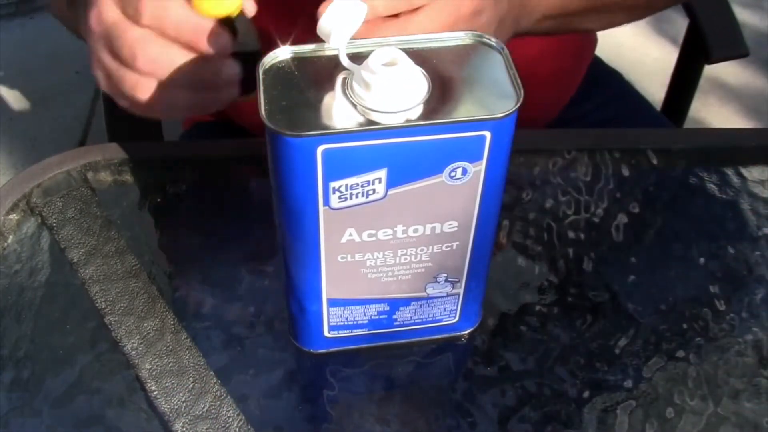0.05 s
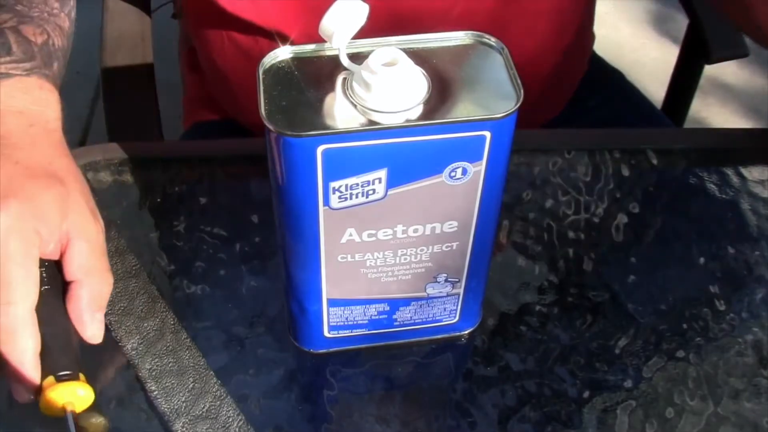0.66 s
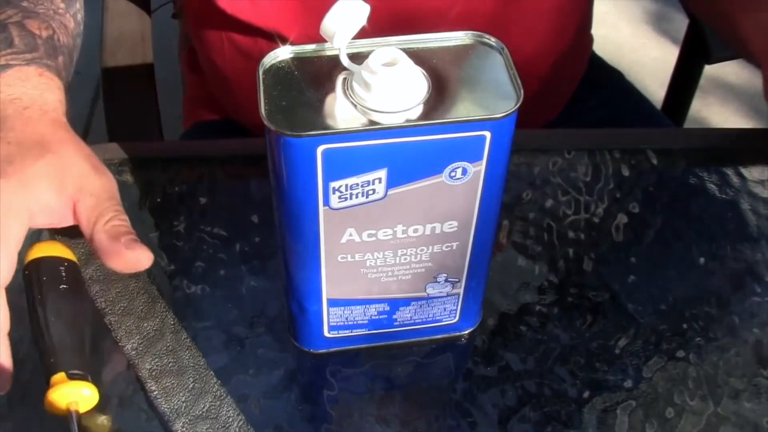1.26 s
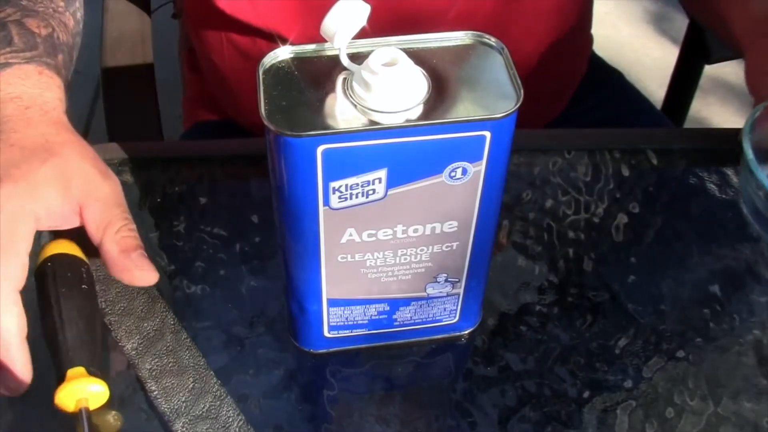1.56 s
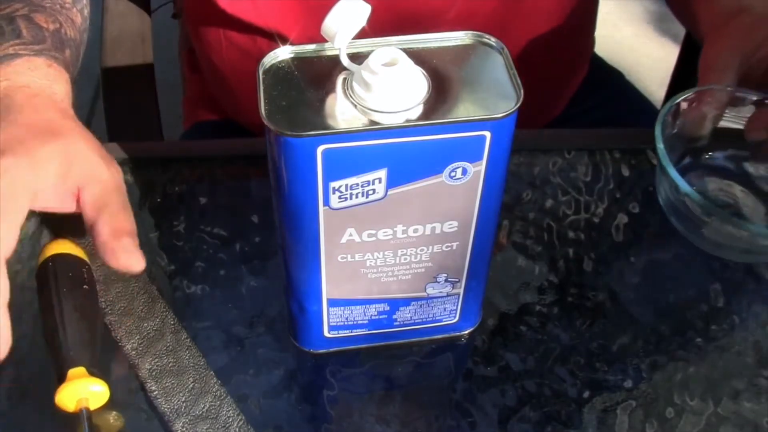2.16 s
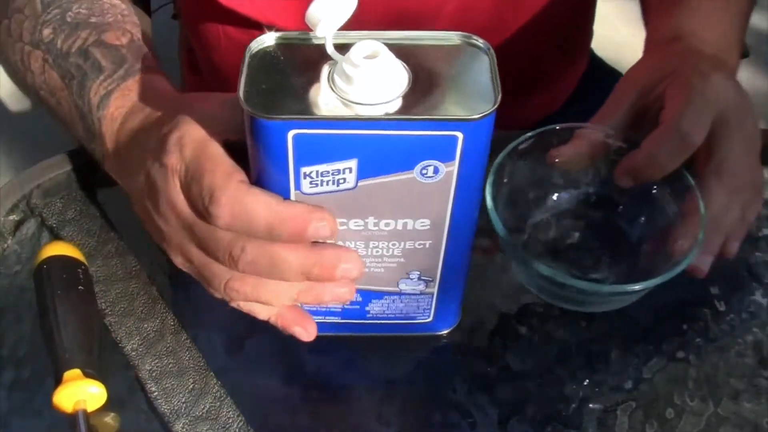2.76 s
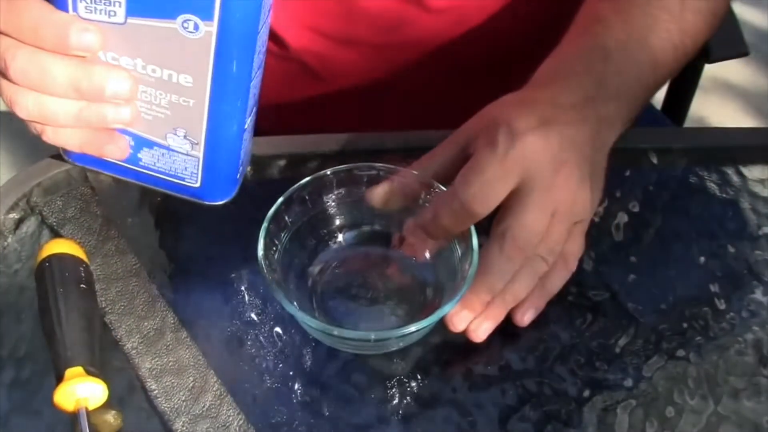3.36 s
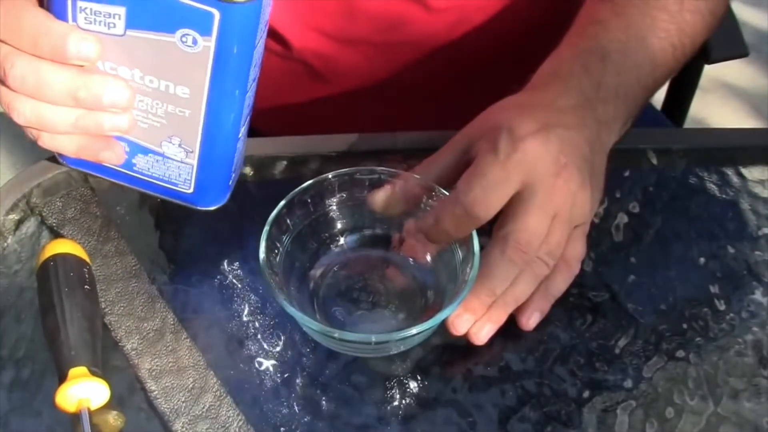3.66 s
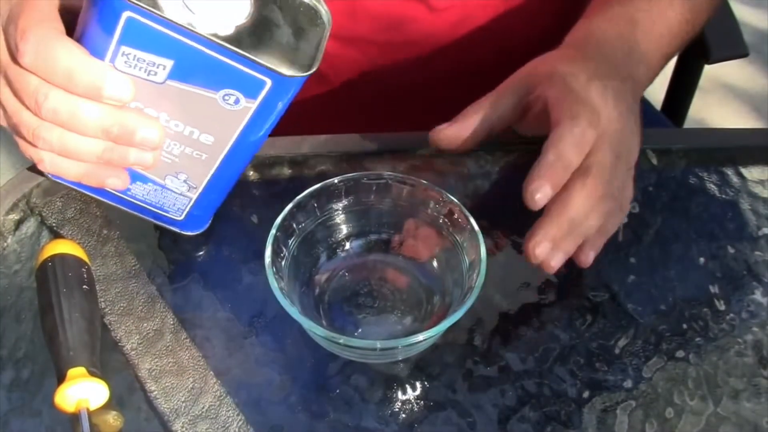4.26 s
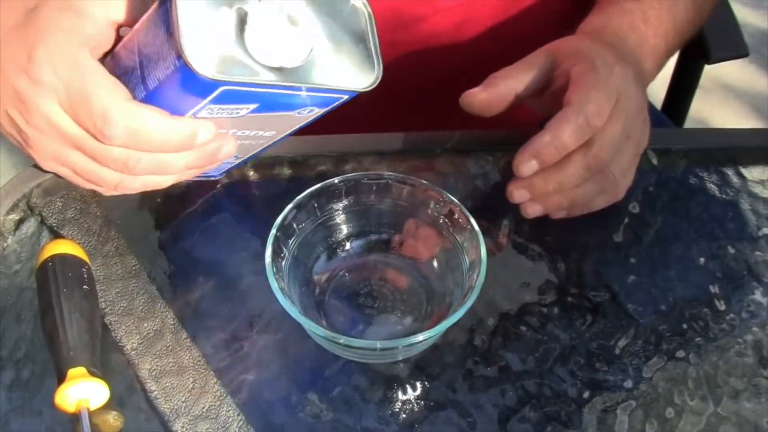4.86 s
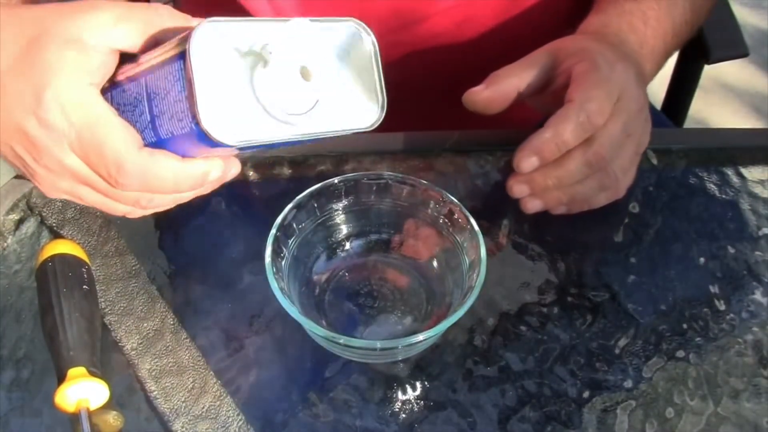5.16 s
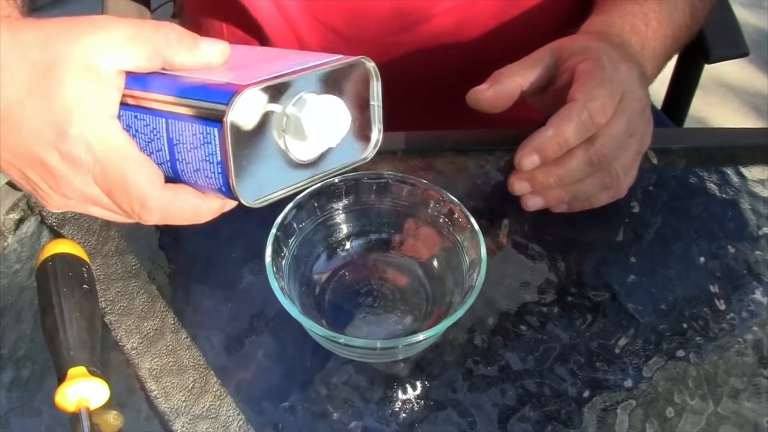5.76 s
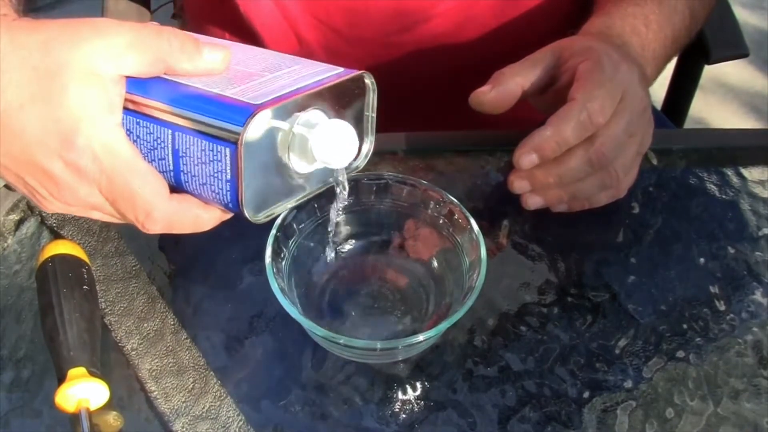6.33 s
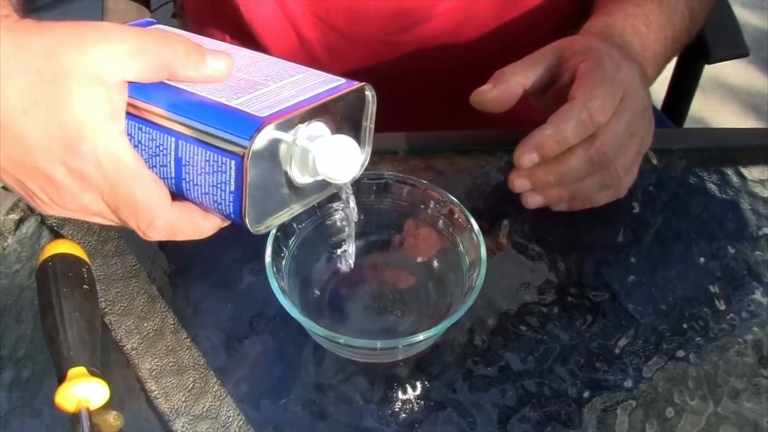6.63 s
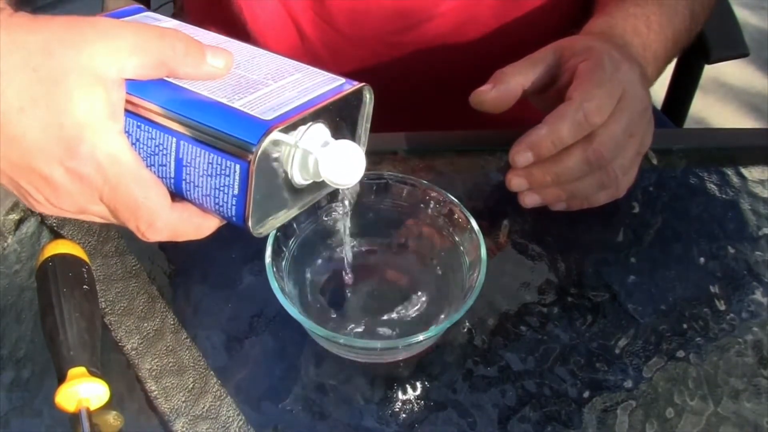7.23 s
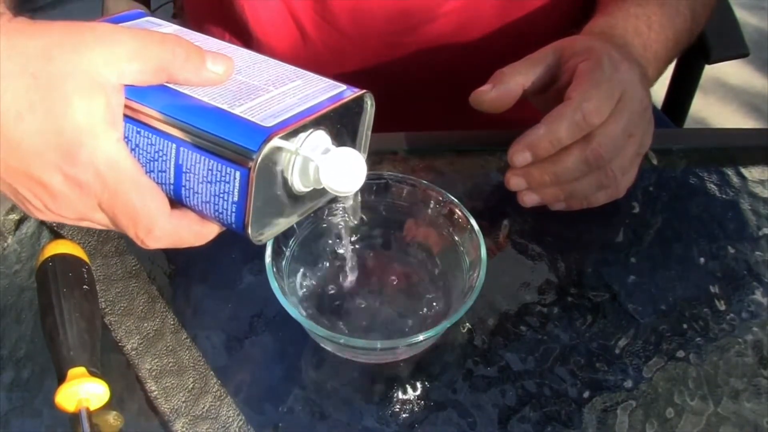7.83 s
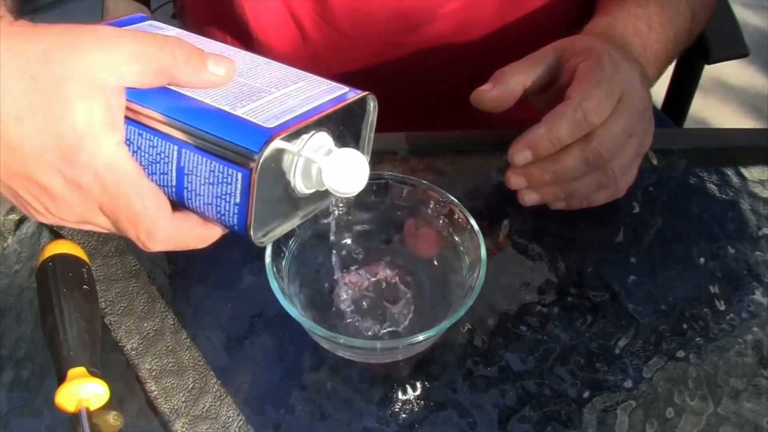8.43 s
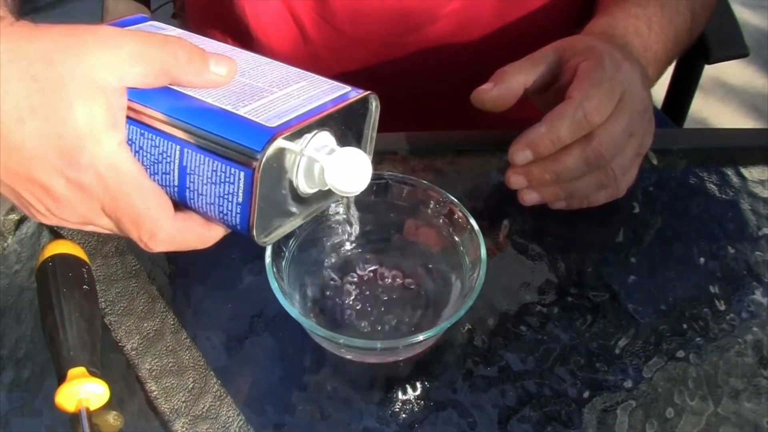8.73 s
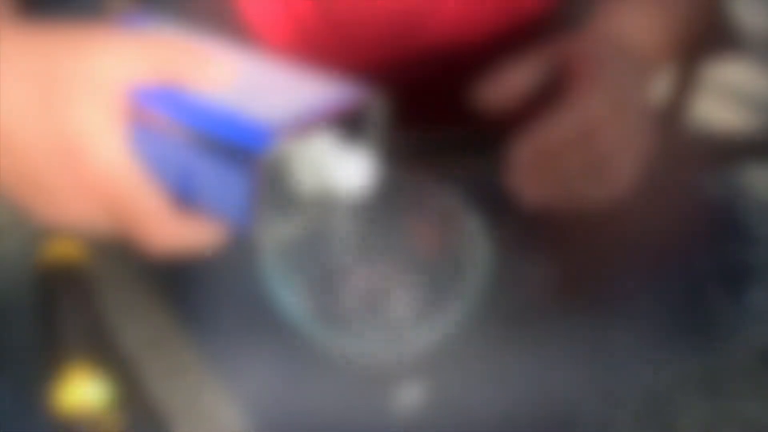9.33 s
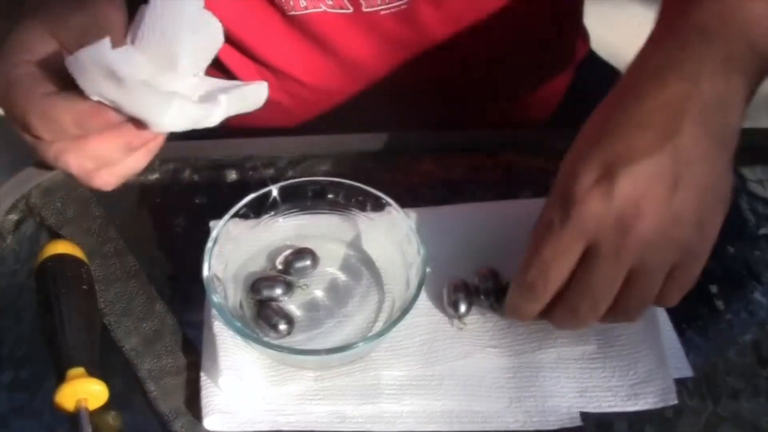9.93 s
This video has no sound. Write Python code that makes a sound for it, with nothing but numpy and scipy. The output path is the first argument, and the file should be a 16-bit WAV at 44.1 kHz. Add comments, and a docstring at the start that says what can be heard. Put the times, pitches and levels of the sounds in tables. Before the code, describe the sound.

Close by, in quiet outdoor air, a screwdriver slides on a glass tabletop and its handle rocks with dull, fading thuds. Next a glass bowl rattles down and scrapes briefly into position, making the table ring. After faint handling rubs and a lull, a tin can clinks against the bowl and liquid starts to pour in a thin, growing trickle of bubbles, small splashes and glassy pings.

```python
"""A skid, then soft thuds: a screwdriver slides onto a glass patio table and rocks to rest on its handle.
A glass bowl clatters down and is nudged into place; each contact rings the table's plate modes.
Hands rub faintly as a tin can is lifted. The can taps the bowl and a thin stream trickles in:
trapped bubbles plop, spit and fizz, and stray drops ping the glass. Soft open-air noise lies underneath."""
import sys
import numpy as np
from scipy import signal
from scipy.fft import rfft, irfft
from scipy.io import wavfile

SR = 44100
rng = np.random.default_rng(int(sys.argv[2]) if len(sys.argv) > 2 else 0)


def digitize_waveform(pressure):
    """Quantize a signal to 16-bit integers and store it at the path in sys.argv[1].

    Rows of a 2-D input are taken as channels; values are limited to [-1, 1].
    """
    field = np.atleast_2d(pressure).T
    bounded = np.clip(field, -1, 1)
    quanta = np.round(bounded * 32767).astype(np.int16)
    wavfile.write(sys.argv[1], SR, quanta)


N = 440559

# Open-air spectrum. Each row: frequency in Hz, relative level in dB.
AIR_SPECTRUM = [(18, -81), (30, -53.5), (104, -3.5), (148, 1), (181, -6), (201, 0), (301, -1), (387, -8.5),
                (596, -10.5), (711, -11), (808, -12), (1730, -19.5), (1910, -19.5), (4300, -24),
                (9800, -38), (12800, -55), (16600, -92.5), (22000, -120)]
# Its stereo width. Each row: frequency in Hz, side against mid in dB.
AIR_SIDE = [(60, -25.5), (110, -22.5), (200, -17), (350, -8), (640, -7), (1160, -7), (2090, -4.5),
            (3770, -7.5), (6820, -3.5), (12300, -3)]
# Hands rubbing. Each row: start in seconds, length in seconds, rush in dB, hiss in dB.
HAND_RUBS = [(0.903, 0.34, -54.5, -62.5), (1.107, 0.65, -59, -69.5), (2.95, 0.75, -57.5, -67.5),
             (3.777, 0.71, -57, -69), (4.216, 0.18, -68, -64.5), (4.372, 0.52, -58, -66)]
# The table's dense modes. Each row: frequency in Hz, strength in dB.
PLATE_STRENGTH = [(60, -29.5), (100, -8.5), (150, -12.5), (200, -0.5), (350, 4), (550, 2.5), (720, -0.5),
                  (1200, -4.5), (1800, -7.5), (2700, -8), (5000, -12), (7000, -9.5), (10000, -21),
                  (12500, -41)]
# Their decay. Each row: frequency in Hz, t60 in seconds.
PLATE_DECAY = [(100, 0.61), (400, 0.33), (1200, 0.27), (2700, 0.26), (4400, 0.18), (7000, 0.11),
               (11000, 0.21)]
# Distinct modes of table, bowl and can on bowl. Each row: frequency in Hz, gain in dB, t60 in seconds.
PLATE_MODES = [(154.4, 6, 0.47), (246, -4, 0.24), (694, -18.5, 0.19), (821, 10, .22), (920, 3.5, 0.35),
               (1053, 2.5, 0.3), (1172, 4.5, .22), (1236, 1, 0.233), (1298, 3.5, 0.21), (1426, 4.5, 0.093),
               (1575, -13, 0.13), (2530, -3, 0.187), (2700, -4, 0.17), (2735, 3.5, 0.12), (3360, 2, 0.211),
               (3460, 3, 0.15)]
BOWL_MODES = [(5160, -15, 0.057), (6730, -3, 0.1204), (8010, -19, .13), (9700, -10.5, .08),
              (10700, -6, 0.052)]
TAP_MODES = [(545, 2.5, 0.056), (1520, -5, 0.084), (1803, 0.5, 0.074), (2300, 1, 0.028), (2650, -8.5, 0.06),
             (3180, -1.5, 0.034), (4150, -15, 0.052), (5290, -5.5, 0.056), (6780, -10, 0.03),
             (7900, -32, 0.25), (11200, -23, 0.037)]
# Sliding contacts. Each row: start in seconds, level in dB, swell in seconds, bass in dB,
# bite near 2 kHz in dB, treble in dB, bowl ring in dB, damping in dB per second.
SCREWDRIVER_SKIDS = [(.572, -26, 0.031, -21, 2, 0, -73, 0), (.5965, -37.5, 0.0011, -7, -14, -2.5, -75, 10),
                     (.629, -47, 0.002, 0.5, -5, -25, -80, 35),
                     (.65, -44.5, 0.00093, -6.5, -1, -21, -76, 31),
                     (.902, -56, 0.0066, -2, 13, 13, -70, 300), (.907, -38, 0.012, 2, -4, -34, -80, 32.5),
                     (1.064, -69, 0.0024, 8, -17, 22, -60, 120)]
BOWL_NUDGES = [(3.021, -38.5, .0025, -8, -35, -15, -76.5, 61),
               (3.637, -30, 0.028, -8.5, 9.5, 6.5, -24.5, 25), (3.6565, -41, .004, -4, 2, -3, -40.5, 24.82),
               (3.684, -37.5, .003, -2, -4.5, -13.5, -56, 30),
               (3.709, -40.5, .002, -11, -2.5, -13.5, -61, 30), (3.7195, -45, .001, -24, 7.5, -10, -60, 30),
               (3.945, -69, 0.016, -3, 8, 22.5, -29.5, 40)]
# Peaks and dips of each contact spot. Each row: centre in Hz, width in Hz, gain in dB.
SCREWDRIVER_COLOUR = [(273, 150, 6.5), (750, 140, -1), (947, 77, 1.5), (1055, 25, 7), (1196, 40, -6),
                      (1380, 200, 5), (1550, 40, -2), (1810, 42, -11), (1770, 40, 0), (2120, 40, 6),
                      (2445, 105, 8.5), (2590, 40, 11.5), (3260, 90, 4), (3560, 190, 1.5),
                      (5640, 1700, -3.5)]
CLATTER_COLOUR = [(930, 74, 5), (1310, 46, 7), (1630, 150, 3), (1905, 86, 8), (2394, 60, 8), (2740, 200, 0),
                  (2950, 67, 6.5), (3680, 480, 7), (4170, 550, 9.5), (5300, 200, 7), (7400, 400, 3.5),
                  (8560, 170, 12), (9080, 160, 12.5), (11000, 1200, -14)]
NUDGE_COLOUR = [(150, 80, -1.5), (250, 150, -7), (590, 61, 6.5), (1388, 120, 4), (1220, 50, 10),
                (1680, 160, 1.5), (2220, 690, -5), (2600, 100, 6.5), (3460, 40, 2.5), (3700, 300, 3),
                (5870, 50, 3)]
# The handle rocking. Each row: start in seconds, thud in dB, thud pitch in Hz, table ring in dB,
# contact cut-off in Hz, left-right pan in dB.
HANDLE_ROCKS = [(0.8975, -12, 327, -46, 2300, -23.5), (1.1521, -15.5, 307, -46, 1880, 0),
                (1.352, -12.5, 319, -48.5, 715, 0), (1.573, -12.5, 294, -47.5, 470, 0),
                (1.755, -19.5, 322, -56, 470, -2), (1.951, -18.5, 318, -60, 497, 1)]
# Its rounder rebounds. Each row: start in seconds, level in dB, pitch in Hz.
HANDLE_REBOUNDS = [(0.91, -20, 322), (0.929, -20, 284), (0.94, -16, 252), (0.963, -17, 273),
                   (0.979, -22.5, 259), (1.005, -27.5, 264), (1.076, -29, 268), (1.189, -24.5, 310),
                   (1.21, -28, 330), (1.226, -28, 353), (1.37, -21.5, 352), (1.389, -26.5, 296),
                   (1.41, -30, 310), (1.595, -19, 286), (1.637, -27, 268), (1.653, -31.5, 280),
                   (1.786, -27.5, 328), (1.979, -34.5, 298)]
# Thin chirps. Each row: start in seconds, length in seconds, level in dB, pitch in Hz, width in Hz.
THIN_SQUEAKS = [(0.955, 0.19, -59.5, 10960, 300), (1.056, 0.029, -44.5, 4900, 300),
                (1.088, 0.028, -49, 6730, 200), (1.334, 0.07, -52.5, 4930, 220),
                (3.217, 0.11, -59, 4920, 300), (3.632, 0.064, -25.5, 6610, 44.7),
                (3.934, 0.076, -49, 6620, 80), (4.42, 0.28, -64, 6300, 900), (4.445, 0.17, -70, 10500, 500),
                (4.528, 0.18, -57.5, 4550, 700), (5.894, 0.053, -66.5, 5400, 120),
                (5.984, 0.06, -63.5, 4310, 130)]
# Bowl knocks: the bowl on the table, and at 6.96 s the can touching the bowl. Each row: start in seconds, #
# level in dB, bite near 2 kHz in dB, thud in dB, hand damping in dB per second, initial left-right pan in dB.
BOWL_KNOCKS = [(2.8436, -51.5, 15.5, -22.5, 143, 0), (2.905, -45, 12.5, -46, 205, 1),
               (2.9174, -41, 0, -25, 52, 0), (2.976, -44, -0.5, -25.5, 10, 1),
               (3.004, -40, 1.5, -25, 54.5, 0), (3.035, -42, -6, -19, 31.5, 2),
               (3.0576, -40, 1, -16, 124, 1), (3.0935, -36.5, -1, -24, 58, -3),
               (3.793, -48.5, -8, -38, 29, 0), (3.806, -34, 6, -41.5, 39, 12.5),
               (3.8124, -39, 9, -42.5, 60, -2), (3.818, -38, -4, -33, 53.5, -2),
               (6.9606, -40.5, 1, -25.5, 62, 2)]
# Single bubbles. Each row: start in seconds, level in dB, pitch in Hz, t60 in cycles.
PLOP_BUBBLES = [(4.197, -37, 528, 24), (6.361, -49, 1430, 69.5), (6.375, -50, 1690, 60.5),
                (6.9471, -14.5, 3950, 41), (7.0554, -17.5, 2090, 25), (7.273, -32.5, 693, 34),
                (7.466, -31.5, 2670, 45), (7.479, -21, 1420, 20), (7.4925, -26.5, 1810, 33),
                (7.646, -12, 5920, 55), (7.663, -27, 1677, 50), (7.7893, -14.5, 2920, 20),
                (7.8, -27, 2250, 31), (8.0152, -26, 2160, 11), (8.162, -36, 1900, 30),
                (8.1954, -19, 3060, 46), (8.22, -37, 810, 27), (8.229, -26, 1100, 37),
                (8.237, -23.5, 1286, 27), (8.257, -26, 1176, 31), (8.392, -23.5, 2290, 52),
                (8.399, -17, 2620, 32), (8.432, -31, 2770, 28), (8.459, -27.5, 3540, 40),
                (8.475, -33, 1490, 20), (8.494, -30, 1460, 31), (8.509, -29, 1870, 29),
                (8.6201, -27.5, 1397, 27), (8.6494, -15.5, 2110, 38), (8.668, -27.5, 1260, 24),
                (8.6758, -30, 925, 35), (8.729, -30, 1064, 18), (8.8482, -22.5, 1695, 33),
                (8.893, -33, 2670, 29), (8.927, -27, 1180, 35), (8.9581, -21.5, 3470, 19),
                (8.959, -27, 1340, 16), (8.9762, -23, 4790, 51), (9.1367, -10, 3420, 23),
                (9.1499, -16, 2170, 28), (9.2073, -21.5, 2020, 24), (9.224, -21.5, 1430, 36),
                (9.287, -15.5, 2400, 3), (9.3453, -29.5, 702, 39), (9.395, -31, 1226, 23),
                (9.511, -27, 1264, 46), (9.578, -27, 1835, 36), (9.59, -23, 3610, 48),
                (9.63, -35, 1290, 25), (9.6713, -24, 1336, 48), (9.745, -24, 2700, 27),
                (9.751, -27.5, 2720, 47), (9.783, -26, 3145, 36), (9.801, -21.5, 1176, 32),
                (9.83, -35, 2160, 3), (9.9849, -32, 1214, 29)]
# Drops on bare glass. Each row: start in seconds, level in dB, pitch in Hz.
GLASS_PINGS = [(6.3, -62, 6660), (7.015, -41, 10930), (7.231, -34.5, 6450), (7.4125, -43, 6500),
               (7.603, -39, 10640), (7.741, -40, 6460), (7.88, -37, 6500), (7.957, -43, 6500),
               (8.105, -31.5, 10090), (8.15, -36, 6340), (8.369, -31.5, 6310), (8.852, -35, 6270),
               (9.507, -28, 6250)]
# Drops on liquid. Each row: start in seconds, level in dB, lowest pitch in Hz, left-right pan in dB.
DROP_SPITS = [(6.4748, -63, 9000, 0), (6.543, -59.5, 10950, 1), (7.0142, -35, 8600, 17),
              (7.055, -29, 4570, 2), (7.2, -39, 9300, -4), (7.338, -38.5, 8900, -3),
              (7.4126, -28, 7340, -22), (7.4345, -20.5, 8200, 1), (7.478, -27, 4950, 2),
              (7.574, -29, 7500, -1), (7.6024, -24, 10300, 1), (7.6575, -13.5, 7900, -0.5),
              (7.667, -19, 7400, 0), (7.7403, -22.5, 7200, 1.5), (7.797, -21.5, 6060, -5),
              (7.8082, -20, 3620, 0), (7.813, -20, 6000, 3), (7.834, -22, 6100, 2),
              (7.8788, -23.5, 6100, -2), (8.0145, -15.5, 3890, 0), (8.017, -14.5, 3790, 0),
              (8.1486, -23, 7620, 0), (8.1948, -19.5, 5330, 1.5), (8.216, -17, 6270, -1),
              (8.2257, -19, 8500, 4), (8.243, -17.5, 3560, 0.5), (8.258, -14.5, 6440, -1.5),
              (8.3211, -19, 3750, 5.5), (8.3922, -16.5, 5940, 2), (8.4, -27, 5370, -5),
              (8.433, -25.5, 6500, -5), (8.4722, -28, 6090, 3), (8.484, -19, 6130, -1),
              (8.5034, -20.5, 7900, -2), (8.591, -18, 7160, 1), (8.6144, -14.5, 4980, 2),
              (8.6235, -15.5, 5850, 1), (8.675, -20.5, 5870, -2), (8.793, -20, 6000, -1),
              (8.816, -21.5, 9100, -2), (8.854, -20.5, 6380, 3), (8.89, -26, 6880, 2),
              (8.897, -21, 4550, 1), (8.901, -23, 6850, -1), (8.964, -37, 9300, -2),
              (9.0261, -16, 6320, -1), (9.052, -38, 6900, 0), (9.087, -24, 7200, 20),
              (9.093, -21, 6000, 13), (9.1201, -13.5, 6500, 2), (9.1499, -18.5, 4300, -1),
              (9.166, -23, 8500, 0), (9.184, -26, 6530, -1), (9.207, -33.5, 5850, -5),
              (9.2864, -17, 3350, 1), (9.328, -20.5, 6200, -2), (9.3548, -26, 7500, 0),
              (9.3691, -14.5, 6320, -0.5), (9.4045, -23, 7500, 0), (9.4095, -34, 5500, 3),
              (9.415, -30, 7100, 2), (9.4288, -15, 6150, -0.5), (9.626, -21, 6980, 0),
              (9.634, -22, 5640, 0), (9.654, -24, 8300, -2), (9.7419, -22.5, 6330, -2),
              (9.763, -22.5, 5310, 1), (9.8007, -15.5, 4100, 2), (9.808, -21.5, 4020, -6),
              (9.83, -25, 3600, 0), (9.854, -30, 5700, 1), (9.8828, -24.5, 3480, -1.5),
              (9.8885, -24.5, 5380, 2)]
# The stream's churn. Each row: time in seconds, share of full pour.
POUR_FLOW = [(7.25, 0.024), (7.45, 0.56), (7.7, 0.73), (8.1, 0.68), (8.6, 0.99), (9.3, 0.84), (9.99, 0.99)]
# The stream breaking up. Each row: start in seconds, length in seconds, lead bubble level in dB,
# lowest pitch in Hz.
STREAM_SPLASHES = [(7.473, 0.021, -41, 1510), (7.637, 0.012, -31, 4970), (7.791, 0.034, -32, 2770),
                   (7.952, 0.078, -34, 3750), (8.154, 0.044, -35, 2040), (8.208, 0.039, -36, 4500),
                   (8.388, 0.056, -29.5, 2330), (8.453, 0.065, -28.5, 1720), (8.611, 0.026, -27, 2350),
                   (8.65, 0.053, -34.5, 1365), (8.838, 0.066, -27, 2220), (8.905, 0.036, -37.5, 2510),
                   (9.084, 0.062, -28.5, 2380), (9.156, 0.072, -39, 2406), (9.278, 0.014, -24.5, 2057),
                   (9.301, 0.046, -30, 2330), (9.401, 0.068, -35, 4120), (9.504, 0.026, -34, 2196),
                   (9.562, 0.028, -33.5, 2066), (9.625, 0.021, -42, 1510), (9.743, 0.047, -33, 2410),
                   (9.79, 0.046, -33.5, 1464)]

CONTACT_PAN_DB, RUMBLE_T60_S = -1, 0.85
TAP_S = 6.9605
SMALLEST_BUBBLE_HZ, SMALL_BUBBLE_CYCLES = 11290, 52


def from_db(db):
    """Decibels to gain."""
    return 10 ** (np.asarray(db) / 20)


def rms_one(x):
    """Scale to rms 1."""
    return x / np.sqrt(np.mean(x ** 2) + 1e-20)


def at_hz(points, hz):
    """Read a table on a log-frequency axis."""
    known_hz, values = np.transpose(points)
    return np.interp(np.log(np.maximum(hz, 1)), np.log(known_hz), values)


def seconds(length_s):
    """Time axis."""
    return np.arange(int(length_s * SR)) / SR


def fade(t, t60_s):
    """Free decay, 60 dB down at t60_s."""
    return np.exp(-np.log(1000) * t / t60_s)


def stereo(mid, side, pan_db=0):
    """Mid and side to panned left and right."""
    return np.array([mid + side, mid - side]) * from_db([[pan_db / 2], [-pan_db / 2]])


def add(track, start_s, sound):
    """Mix a sound in at start_s."""
    i = int(np.clip(start_s * SR, 0, N - 1))
    track[..., i:i + sound.shape[-1]] += sound[..., :N - i]


def narrow_noise(hz, width_hz, length_s):
    """Noise of rms 1 around one pitch."""
    t = seconds(length_s)
    lowpass = signal.butter(2, width_hz / 2, fs=SR, output="sos")
    sway = signal.sosfilt(lowpass, rng.standard_normal((2, len(t))))
    return rms_one(sway[0] * np.sin(2 * np.pi * hz * t) + sway[1] * np.cos(2 * np.pi * hz * t))


def flow_at(time_s):
    """Share of full pour."""
    return np.interp(time_s, *np.transpose(POUR_FLOW), left=0)


def wash_power(air_db=(-59, -62.5, -75.5), pour_db=(-52, -57, -64.5), spray_db=-28, shake_db=-32):
    """Rumble, rush and hiss power over time: air, pour, hands, spray and the shaken table."""
    power = from_db(air_db)[:, None] ** 2 + (from_db(pour_db)[:, None] * flow_at(np.arange(N) / SR)) ** 2
    for start_s, length_s, rush_db, hiss_db in HAND_RUBS:
        rub_power = from_db([[rush_db + 2.5], [rush_db], [hiss_db]]) ** 2
        add(power, start_s, rub_power * np.hanning(int(length_s * SR)))
    for start_s, length_s, lead_db, _ in STREAM_SPLASHES:
        lingering = np.hanning(int((length_s + 0.027) * SR))
        add(power[2], start_s, from_db(lead_db + spray_db) ** 2 * lingering)
    for start_s, thud_db, *_ in HANDLE_ROCKS:
        add(power[0], start_s, (from_db(thud_db + shake_db) * fade(seconds(2), RUMBLE_T60_S)) ** 2)
    return power


def wash(low_hz=500, high_hz=4800):
    """Soft noise in three bands, swelling with handling and pouring."""
    hz = np.fft.rfftfreq(N, 1 / SR)
    mid, side = rfft(rng.standard_normal((2, N))) * from_db(at_hz(AIR_SPECTRUM, hz))
    spectrum = stereo(mid, from_db(at_hz(AIR_SIDE, hz)) * side)
    rumble = 1 / (1 + (hz / low_hz) ** 4)
    hiss = 1 - 1 / (1 + (hz / high_hz) ** 6)
    bands = [rms_one(irfft(spectrum * share, N)) for share in (rumble, 1 - rumble - hiss, hiss)]
    return sum(band * np.sqrt(power) for band, power in zip(bands, wash_power()))


def thin_tone(hz=1790, width_hz=90, level_db=-74):
    """A faint, flickering tone in the open air."""
    return from_db(level_db) * narrow_noise(hz, width_hz, N / SR + 1)[:N]


def glass_plate(count=690, spacing_hz=17):
    """Plate modes, about evenly spaced: pitches, strengths and free decays."""
    hz = 50 + spacing_hz * (np.arange(count) + rng.uniform(-.3, .3, count))
    dense = np.column_stack([hz, at_hz(PLATE_STRENGTH, hz), at_hz(PLATE_DECAY, hz)])
    hz, level_db, t60_s = np.vstack([dense, PLATE_MODES]).T
    t = seconds(.25)
    return hz, from_db(level_db), np.sin(2 * np.pi * hz[:, None] * t) * fade(t, t60_s[:, None])


def strike(plate, colour_db, width):
    """Each spot drives the modes with its own signs. Returns mid and side."""
    hz, strength, rings = plate
    signs = rng.choice([-1, 1], (2, len(hz)))
    mid, side = (signs * strength * from_db(colour_db)) @ rings
    return mid, width * side


def spot_db(spot, hz):
    """A contact spot favours some modes and misses others."""
    return sum(db * np.exp(-(2 * (hz - centre_hz) / width_hz) ** 2) for centre_hz, width_hz, db in spot)


def ripple_db(hz, spacing_hz=300):
    """The struck part adds random peaks and dips, most in the treble."""
    knots_db = rng.normal(-1, 3.5, 64)
    return np.interp(hz / spacing_hz, np.arange(len(knots_db)), knots_db) * np.minimum(hz / 6000, 1)


def bowl_ring(t):
    """The glass wall's response to one touch."""
    return sum(from_db(db) * np.sin(2 * np.pi * hz * t) * fade(t, t60_s) for hz, db, t60_s in BOWL_MODES)


def contact(plate, spot, level_db, swell_s, bass_db, bite_db, treble_db, ring_db, damping_db_per_s):
    """Hard contact: a crack, then table and bowl ring under the hand's damping."""
    hz, t = plate[0], np.arange(plate[2].shape[1]) / SR
    tilt = [(600, bass_db), (1050, 0.00095), (1300, 0.002), (1900, bite_db), (7000, treble_db)]
    colour_db = at_hz(tilt, hz) + ripple_db(hz) + spot_db(spot, hz)
    crack = 1 + 0.845 * fade(t, t60_s=0.072)
    mid, side = strike(plate, colour_db + level_db, width=.2) * crack
    envelope = np.minimum(t / swell_s, 1) ** 2 * from_db(-damping_db_per_s * t)
    return stereo(mid + from_db(ring_db) * bowl_ring(t), side, CONTACT_PAN_DB) * envelope


def skids(plate):
    """Screwdriver and bowl slide and catch on the table."""
    out = np.zeros((2, N))
    for touches, spot in ((SCREWDRIVER_SKIDS, SCREWDRIVER_COLOUR), (BOWL_NUDGES, NUDGE_COLOUR)):
        for start_s, *touch in touches:
            add(out, start_s, contact(plate, spot, *touch))
    return out


def lean(sound, pan_db, t60_s=0.099):
    """An off-centre blow starts louder on one side, then spreads through the table."""
    t = np.arange(sound.shape[1]) / SR
    return sound * from_db(np.outer([.5, -.5], pan_db * fade(t, t60_s)))


def thud(level_db, hz, pan_db=CONTACT_PAN_DB, swell_cycles=1.17):
    """A hollow push of a few cycles."""
    t = seconds(.1)
    push = t * hz / swell_cycles
    envelope = (push * np.exp(1 - push)) ** 2
    return stereo(from_db(level_db) * np.sin(2 * np.pi * hz * t) * envelope, 0, pan_db)


def rocking(plate, body_hz=310, body_db=8, body_octaves=0.64):
    """Each rock of the soft handle thuds, knocks the table dully and rebounds."""
    out = np.zeros((2, N))
    hz, t = plate[0], np.arange(plate[2].shape[1]) / SR
    hollow_db = body_db * np.exp(-(np.log2(hz / body_hz) / body_octaves) ** 2)
    knock_db = spot_db([(1320, 300, 5)], hz)
    envelope = (1 - fade(t, t60_s=0.0045)) * (0.85 + 0.67 * fade(t, t60_s=0.12))
    for start_s, thud_db, thud_hz, table_db, cutoff_hz, pan_db in HANDLE_ROCKS:
        soft_db = -10 * np.log10(1 + (hz / cutoff_hz) ** 5)
        mid, side = strike(plate, hollow_db + knock_db + soft_db + table_db, width=0.14) * envelope
        add(out, start_s, lean(stereo(mid, side, CONTACT_PAN_DB), pan_db))
        add(out, start_s, thud(thud_db, thud_hz, pan_db))
    for start_s, level_db, bump_hz in HANDLE_REBOUNDS:
        add(out, start_s, thud(level_db, bump_hz, swell_cycles=1.82))
    return out


def drumming(table_hz=110, width_hz=32, after_rock_db=-43, full_pour_db=-66):
    """The table's lowest modes tremble after each rock and under the stream."""
    drive = from_db(full_pour_db) * flow_at(np.arange(N) / SR)
    for start_s, thud_db, *_ in HANDLE_ROCKS:
        add(drive, start_s, from_db(thud_db + after_rock_db) * fade(seconds(1.8), RUMBLE_T60_S))
    return drive * narrow_noise(table_hz, width_hz, N / SR + 1)[:N]


def squeaks():
    """Brief thin chirps and whistles; the loudest is the bowl's foot squealing on the table."""
    out = np.zeros(N)
    for start_s, length_s, level_db, hz, width_hz in THIN_SQUEAKS:
        tone = narrow_noise(hz, width_hz, length_s)
        add(out, start_s, from_db(level_db) * tone * np.hanning(len(tone)))
    return out


def knocks(plate, nudge_s=3.5, swell_s=0.00092, bass_db=-4, thud_hz=250, bounce_s=0.0206, bounce_db=-4):
    """The bowl clatters, brighter when harder; its weight thuds and bounces once."""
    out = np.zeros((2, N))
    mean_db = np.mean([row[1] for row in BOWL_KNOCKS])
    for start_s, level_db, bite_db, thud_db, damping_db_per_s, pan_db in BOWL_KNOCKS:
        treble_db = -17.5 + (level_db - mean_db) + 0.9 * bite_db
        ring_db = level_db + treble_db - 16
        spot = CLATTER_COLOUR if start_s < nudge_s else NUDGE_COLOUR
        knock = contact(plate, spot, level_db, swell_s, bass_db, bite_db, treble_db, ring_db,
                        damping_db_per_s)
        add(out, start_s, lean(knock, pan_db))
        add(out, start_s, thud(thud_db, thud_hz))
        add(out, start_s + bounce_s, thud(thud_db + bounce_db, thud_hz))
    return out


def bubble(level_db, hz, cycles, rise=0.061, onset_share=0.082):
    """A trapped bubble swells and rings, its pitch rising as it nears the surface."""
    life_s = max(cycles, 8) / hz
    t = seconds(life_s)
    onset_s = max(onset_share * life_s, 2 / hz)
    envelope = fade(t, life_s) * (1 - np.exp(-(t / onset_s) ** 2))
    phase = 2 * np.pi * hz * t * (1 + rise * (t / life_s - .2))
    return from_db(level_db) * envelope / envelope.max() * np.sin(phase)


def in_bowl(sound, echo_db=-18, spread_db=1.5, echoes=5):
    """Each place in the bowl has its own direction and quick echoes off wall and table."""
    paths = np.zeros((2, int(.006 * SR)))
    paths[:, 0] = from_db(rng.normal(0, spread_db) * np.array([.5, -.5]))
    gains = from_db(echo_db) * rng.choice([-1, 1], echoes) * rng.normal(1, 0.17, (2, echoes))
    paths[:, rng.integers(20, paths.shape[1], echoes)] = gains
    return np.array([np.convolve(sound, path) for path in paths])


def plops(ragged=0.13, jostle_cycles=1.77, shed_gap_s=.004, shed_octaves=1.1, shed_below_hz=3000):
    """A large bubble rings unevenly in churning liquid and sheds three weaker ones."""
    out = np.zeros((2, N))
    for start_s, level_db, hz, cycles in PLOP_BUBBLES:
        tone = bubble(level_db, hz, cycles, rise=.14, onset_share=.06)
        jolts = rng.standard_normal(64)
        jostle = np.interp(np.arange(len(tone)) / SR * hz / jostle_cycles, np.arange(len(jolts)), jolts)
        add(out, start_s, in_bowl(tone * (1 + ragged * flow_at(start_s) * jostle)))
        shed_gain = np.sqrt(flow_at(start_s) / (1 + (hz / shed_below_hz) ** 4))
        for k, (late, detune) in enumerate(rng.uniform(-0.499, 0.505, (3, 2)), 1):
            shed = bubble(level_db - 6 - 4.5 * k, hz * 2 ** (shed_octaves * detune), cycles, rise=.1)
            add(out, start_s + (k + late) * shed_gap_s, shed_gain * in_bowl(shed))
    return out


def pings(t60_s=0.061, swell_s=0.0017):
    """A drop on the bare wall rings one glassy mode."""
    out, t = np.zeros((2, N)), seconds(.1)
    envelope = fade(t, t60_s) * (1 - fade(t, swell_s))
    for start_s, level_db, hz in GLASS_PINGS:
        add(out, start_s, in_bowl(from_db(level_db) * np.sin(2 * np.pi * hz * t) * envelope))
    return out


def spits(count=3, base_cycles=27.3, stagger_s=0.00043, step_db=-4, wall_db=-24, sag_per_s=.028):
    """A drop bursts into tiny bubbles; the wall answers, its pitch sinking as the bowl fills."""
    out, t = np.zeros((2, N)), seconds(.1)
    for start_s, level_db, lowest_hz, pan_db in DROP_SPITS:
        burst = np.zeros(len(t))
        ladder_hz = np.geomspace(lowest_hz, SMALLEST_BUBBLE_HZ, count + 1)[:count]
        for k, hz in enumerate(ladder_hz * rng.normal(1, 0.065, count)):
            cycles = base_cycles * 2 ** (rng.normal(0, 0.47) + k / count)
            delay_s = k * stagger_s * rng.random()
            bubble_db = rng.normal(step_db * k, 0.5)
            add(burst, delay_s, bubble(bubble_db, hz, cycles, rise=0.094, onset_share=0.09))
        wall_tuning = rng.normal(1 - sag_per_s * (start_s - TAP_S), 0.0203)  # scattered by slosh
        wall = from_db(wall_db) * bowl_ring(t * wall_tuning)
        spit = from_db(level_db) * (burst / np.abs(burst).max() + wall)
        add(out, start_s, in_bowl(spit) * from_db([[pan_db / 2], [-pan_db / 2]]))
    return out


def tap(gain_db=-18):
    """Tin rim on glass: a few clear modes."""
    out, t = np.zeros(N), seconds(0.2)
    ring = sum(from_db(gain_db + db) * rng.choice([-1, 1]) * np.sin(2 * np.pi * hz * t) * fade(t, t60_s)
               for hz, db, t60_s in TAP_MODES)
    add(out, TAP_S, ring * (1 - fade(t, t60_s=0.0033)))
    return out


def fizz(full_pour_per_s=1000, floor_db=-63.5, scatter_db=3, octaves=3.8):
    """Faint tiny bubbles, more as the flow grows."""
    out, t = np.zeros((2, N)), np.arange(N) / SR
    births_s = t[rng.random(N) < full_pour_per_s * flow_at(t) ** 2 / SR]
    for start_s, (size, luck) in zip(births_s, rng.random((len(births_s), 2))):
        level_db = floor_db + scatter_db * min(-np.log(1 - luck), 3)
        hz = SMALLEST_BUBBLE_HZ / 2 ** (octaves * size ** 1.313)
        add(out, start_s, bubble(level_db, hz, SMALL_BUBBLE_CYCLES))
    return out


def splashes(bubbles_per_s=1300, rank_loss_db=3.3, tilt_db_per_octave=3):
    """A splash traps a cluster of bubbles: a few strong, many weak."""
    out = np.zeros((2, N))
    for start_s, length_s, lead_db, lowest_hz in STREAM_SPLASHES:
        centre_hz = np.sqrt(lowest_hz * SMALLEST_BUBBLE_HZ)
        draws = rng.random((int(bubbles_per_s * length_s), 3))
        for rank, (when, smallness, luck) in enumerate(draws, 1):
            pitch_share = np.sin(np.pi / 2 * smallness ** 0.84) ** 2
            hz = lowest_hz * (SMALLEST_BUBBLE_HZ / lowest_hz) ** pitch_share
            level_db = lead_db - rank_loss_db * np.log2(rank)
            level_db += tilt_db_per_octave * np.log2(hz / centre_hz)
            cycles = SMALL_BUBBLE_CYCLES * 2 ** (1.3 * (luck - .5))
            add(out, start_s + when * length_s, in_bowl(bubble(level_db, hz, cycles)))
    return out


def patio(sound, t60_s=0.19, cutoff_hz=4030, wet_db=-10.5, width=0.26):
    """Nearby walls and the table return a short, dull tail."""
    t = seconds(.25)
    noise = signal.lfilter(*signal.butter(1, cutoff_hz, fs=SR), rng.standard_normal((2, len(t))))
    decay = fade(t, t60_s)
    mid, side = noise * decay * (1 - fade(t, t60_s=0.11)) / np.sqrt(np.sum(decay ** 2))
    return from_db(wet_db) * signal.fftconvolve(stereo(mid, width * side), sound[None], axes=1)[:, :N]


def pour(dip_hz=4700, dip_share=0.27):
    """Bubbles and drops, slightly hollow between gurgle and sparkle, with their echo."""
    liquid = plops() + spits() + pings() + splashes() + fizz()
    octave_band = signal.butter(1, dip_hz * 2 ** np.array([-.5, .5]), "band", fs=SR, output="sos")
    liquid -= dip_share * signal.sosfilt(octave_band, liquid + 1e-18)
    return liquid + patio(liquid.mean(axis=0))


def scene(lowest_hz=90):
    """One table, close in front, too small to radiate deep bass."""
    plate = glass_plate()
    blows = skids(plate) + rocking(plate) + knocks(plate) + tap()
    highpass = signal.butter(3, lowest_hz, "high", fs=SR, output="sos")
    return wash() + signal.sosfilt(highpass, blows + 1e-18) + thin_tone() + squeaks() + pour() + drumming()


def record(dry, rolloff_hz=12600, cutoff_hz=13200):
    """Sharp cracks clip; the microphone rolls off the top octave; a steep cut follows."""
    clipped = np.clip(dry, -.9, .9)
    soft = signal.sosfilt(signal.butter(6, rolloff_hz, fs=SR, output="sos"), clipped)
    return signal.sosfilt(signal.ellip(8, .1, 70, cutoff_hz, fs=SR, output="sos"), soft)


dry = scene()
out = record(dry)
digitize_waveform(out)
```